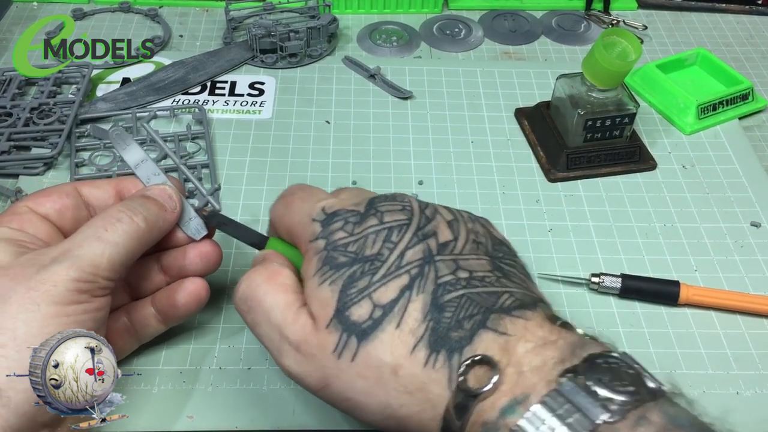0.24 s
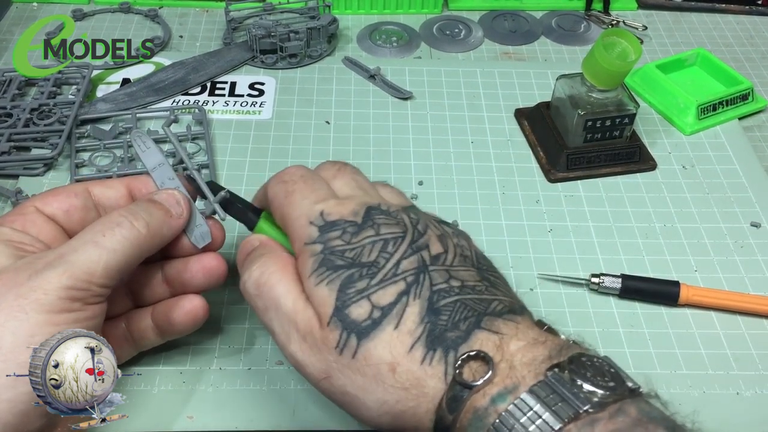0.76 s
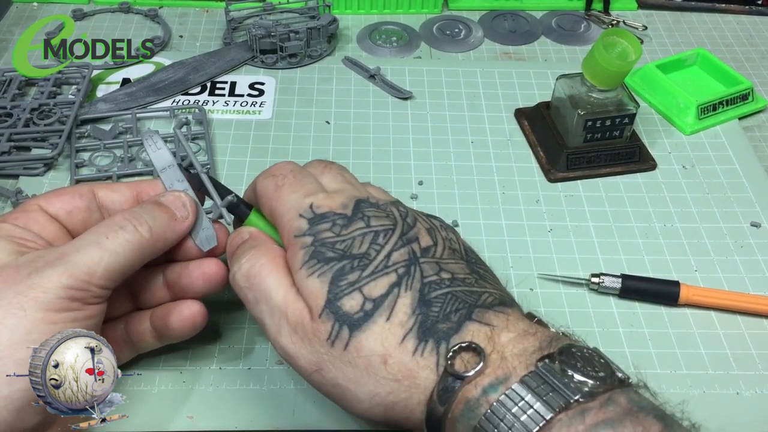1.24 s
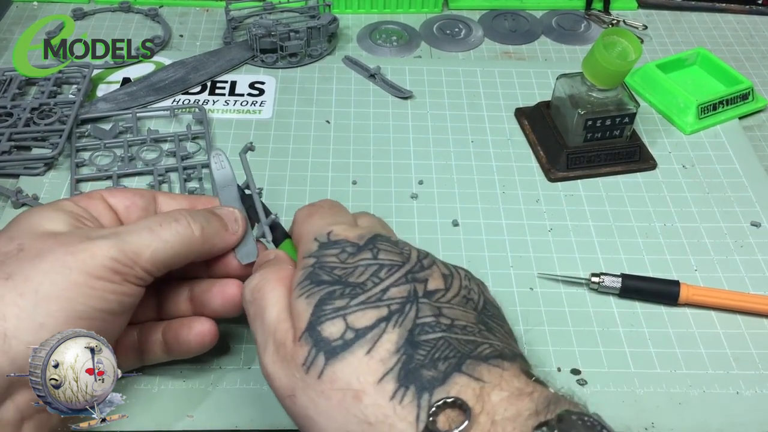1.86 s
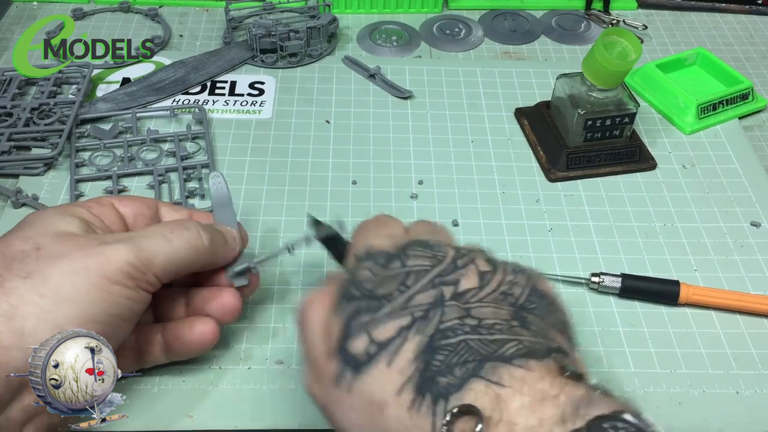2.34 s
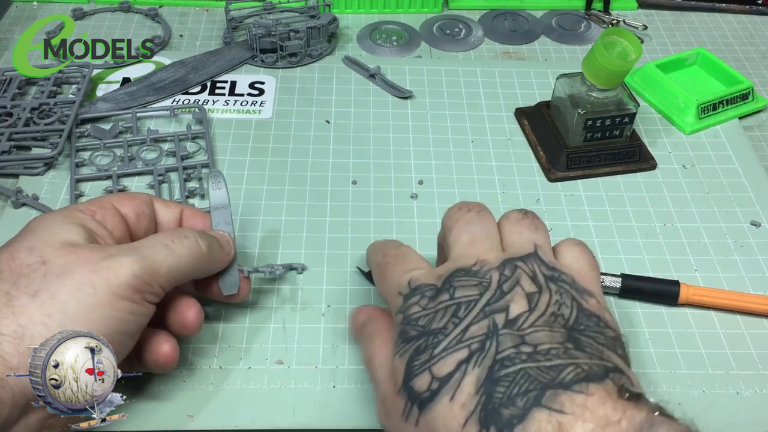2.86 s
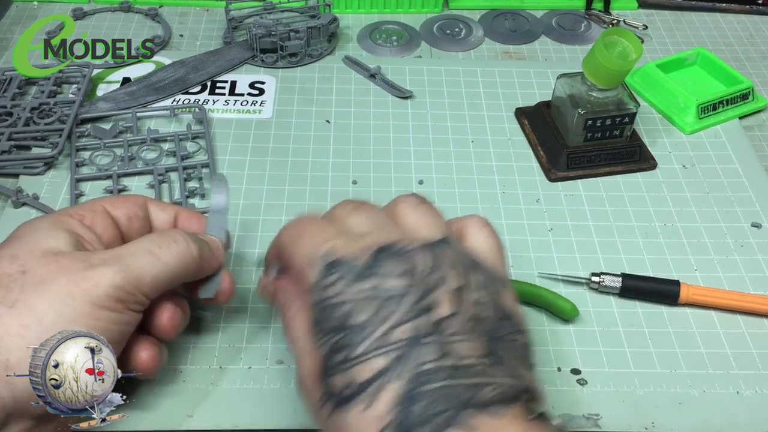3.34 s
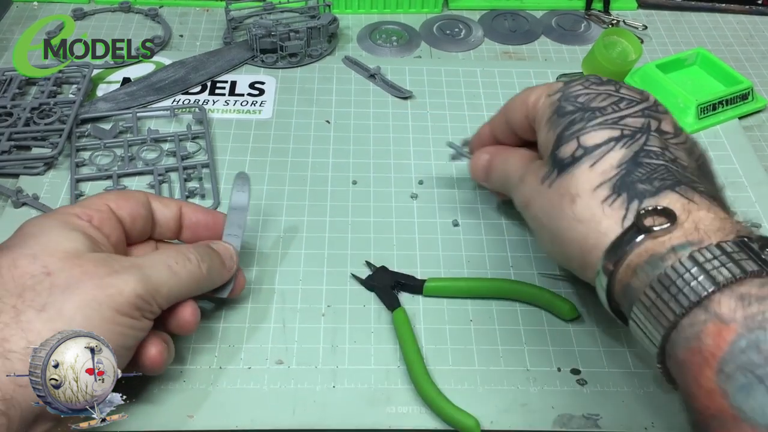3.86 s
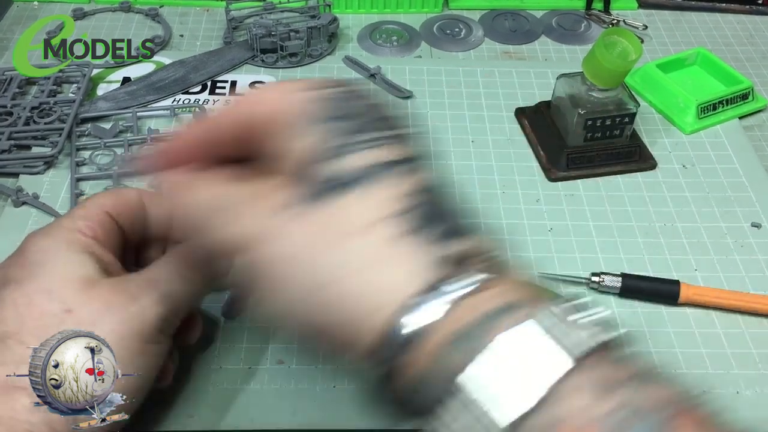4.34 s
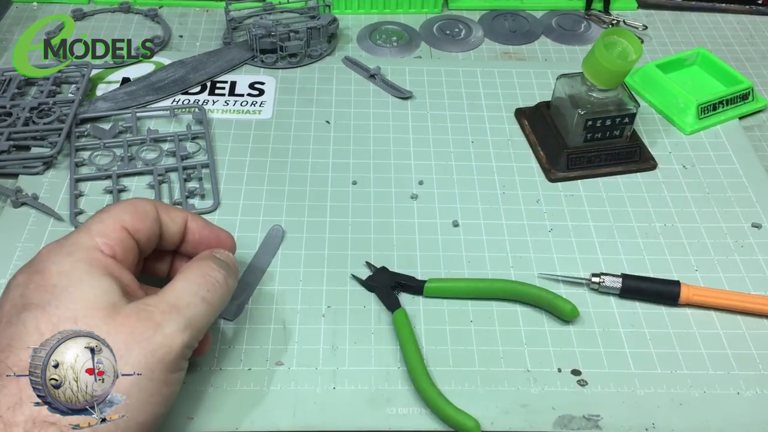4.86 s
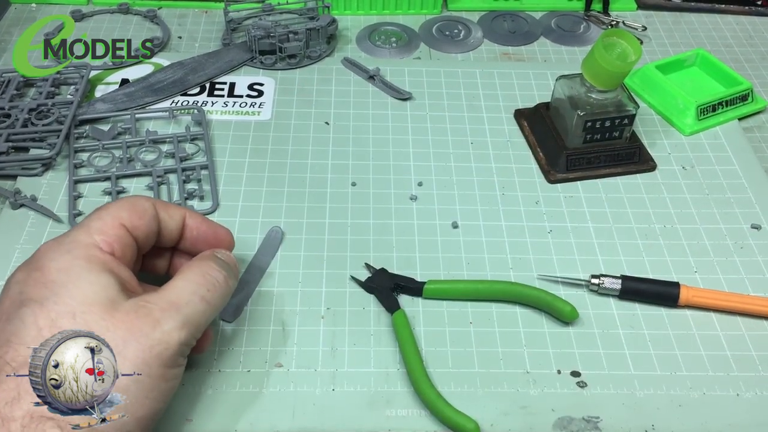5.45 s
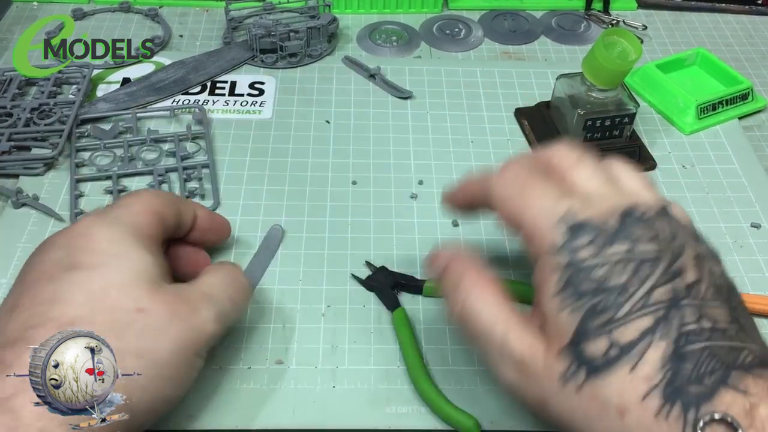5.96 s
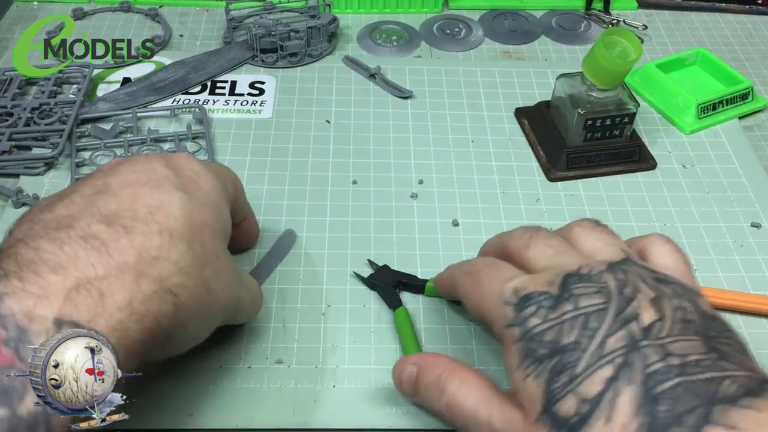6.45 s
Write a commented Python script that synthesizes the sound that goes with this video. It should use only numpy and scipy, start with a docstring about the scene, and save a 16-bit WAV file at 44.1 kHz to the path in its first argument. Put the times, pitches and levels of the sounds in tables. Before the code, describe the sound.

A sharp plastic snip, quieter ticks, hard tool knocks on a bench, a bright strap rattle, then a hollow clatter and soft rubbing in a quiet room.

```python
"""In a small, quiet room, plastic model parts are trimmed and handled on a workbench.
Cutters snap plastic, a sleeve ticks, tools and knuckles land, a watch strap rattles, a hollow thing clatters:
each is a click that rings on. A part scraped over the mat and short rubbing strokes are many tiny slips.
Sleeves rustle as shaped noise, a dry bump is one click, and air noise, rumble and a thin whine lie beneath."""
import sys
import numpy as np
from scipy import signal
from scipy.fft import rfft, irfft
from scipy.io import wavfile

SR = 44100
rng = np.random.default_rng(int(sys.argv[2]) if len(sys.argv) > 2 else 0)


def pcm_store(signal):
    """Save signal as 16-bit PCM."""
    levels = np.round(np.clip(np.atleast_2d(signal), -1, 1) * 32767)
    wavfile.write(sys.argv[1], SR, levels.astype(np.int16).T)


N = 295470  # length of the scene in samples
CLICK_SAMPLES = 16384  # length of every click and room tail


def gain_of(db):
    """Turns decibels into a plain multiplier."""
    return 10 ** (np.asarray(db) / 20)


def evened(x):
    """Scales a sound to an average (rms) level of 1."""
    return x / np.sqrt(np.mean(x ** 2) + 1e-30)


def unit(x):
    """Scales a sound to a total energy of 1."""
    return x / (np.linalg.norm(x) + 1e-15)


def read(points, hz):
    """Reads a curve between its points, with pitch spaced roughly as we hear it."""
    point_hz, value = np.transpose(points)
    return np.interp(np.log(hz + 1), np.log(point_hz + 1), value)


def add(mix, start_s, sound):
    """Mixes a sound in at its start time, cutting off what runs past the end."""
    part = mix[max(round(start_s * SR), 0):][:len(sound)]
    part += sound[:len(part)]


def noise(colour, size=N):
    """Random noise of rms 1, with its low and high parts balanced by a colour curve."""
    spectrum = rfft(rng.standard_normal(size))
    hz = np.fft.rfftfreq(size, 1 / SR)
    return evened(irfft(spectrum * gain_of(read(colour, hz)), size))


def crack(colour, modes=(), spread_s=0):
    """A click whose resonances ring on; bending waves can bring its bass late."""
    hz = abs(np.fft.fftfreq(CLICK_SAMPLES, 1 / SR))
    level_db = read(colour, hz)
    for mode_hz, width_hz, lift_db in modes:
        width_hz = max(width_hz, .055 * mode_hz, 55)  # very narrow resonances are widened
        level_db = level_db + lift_db / (1 + (2 * (hz - mode_hz) / width_hz) ** 2)
    # this timing of the pitches makes the click start at once and ring only afterwards
    spectrum = np.exp(np.conj(signal.hilbert(np.log(gain_of(level_db)))))
    lag = 4 * np.pi * spread_s * np.sqrt(1000 * hz)  # spread_s is the delay at 1 kHz
    delayed = spectrum * np.exp(-1j * lag)
    click = irfft(delayed[:CLICK_SAMPLES // 2 + 1], CLICK_SAMPLES)
    fade = np.cos(np.linspace(0, np.pi / 2, CLICK_SAMPLES)) ** 2
    return unit(fade * click)


def room_tail(rise_s=0.00076):
    """Dense reflections from the bench and near walls, with different pitches dying at different rates."""
    # time to fall by 60 dB: pitch_hz, fade_s
    room_fade = [(100, 0.24), (500, 0.18), (1500, 0.13), (4000, 0.14), (9000, 0.13), (16000, 0.11)]
    hz, t, pieces = signal.stft(rng.standard_normal(CLICK_SAMPLES), SR, nperseg=256)
    decay = gain_of(-60 * t / read(room_fade, hz)[:, None])
    tail = signal.istft(pieces * decay, SR, nperseg=256)[1][:CLICK_SAMPLES]
    build_up = 1 - np.exp(-np.arange(CLICK_SAMPLES) / SR / rise_s)
    return unit(tail * build_up)


def blows(hits, colour, modes, spot_db, shiver_db, shiver_fade_s, room_db, edge_db=-40):
    """Each blow is a ringing crack, then a brief shiver and the room, all shaped by the contact."""
    spot_width, spread_s = 0.32, 0.00031  # width as a share of the spot's pitch; bass delay at 1 kHz
    out, t = np.zeros(N), np.arange(CLICK_SAMPLES) / SR
    for start_s, peak_db, hard_hz, low_hz, ring_db, spot_hz in hits:
        spot = (spot_hz, spot_width * spot_hz, spot_db)
        click = crack(colour, list(modes) + [spot], spread_s)
        # a soft contact loses treble; a light one cannot move the bass
        soft = signal.butter(2, hard_hz, fs=SR, output="sos")
        light = signal.butter(1, low_hz, "high", fs=SR, output="sos")
        first = signal.sosfilt(np.vstack([soft, light]), click)
        first = first + gain_of(edge_db) * np.diff(click, prepend=0)  # a hard edge always ticks a little
        shiver = unit(rng.standard_normal(CLICK_SAMPLES) * gain_of(-60 * t / shiver_fade_s))
        surroundings = gain_of(shiver_db) * shiver + gain_of(room_db) * room_tail()
        after = signal.fftconvolve(first, surroundings)[:CLICK_SAMPLES]
        first_peak = abs(signal.hilbert(first)).max()
        add(out, start_s, gain_of(peak_db) * (first + gain_of(ring_db) * after) / first_peak)
    return out


def grains(per_s, spread_db):
    """Tiny slips at random moments, a few much larger than the rest."""
    size = gain_of(spread_db * np.minimum(rng.exponential(1, N), 4))
    happens = rng.random(N) < per_s / SR
    return evened(size * rng.standard_normal(N) * happens)


def still_room():
    """The quiet room: steady air noise and deep rumble from shaped noise, with a thin electrical whine."""
    # colour of the still air: pitch_hz, level_db
    air_colour = [(18, -72), (30, 12.5), (41, -22.5), (59, -29), (138, -24), (266, -14), (415, -38.5),
                  (684, -31.5), (2290, -33.5), (3770, -34.5), (4080, -34.5), (14800, -42), (16000, -63.5)]
    # colour of the deep rumble: pitch_hz, level_db
    rumble_colour = [(1, -9), (4, 4), (8, 1), (14, -12.5), (25, -29), (50, -24), (90, -35.5), (200, -68.5)]
    air_db, rumble_db, whine_db, whine_hz = -59, -36, -83.5, 3770
    whine = np.sqrt(2) * np.sin(2 * np.pi * whine_hz * np.arange(N) / SR)  # rms 1
    air = gain_of(air_db) * noise(air_colour)
    rumble = gain_of(rumble_db) * noise(rumble_colour)
    return air + rumble + gain_of(whine_db) * whine


def sleeves(uneven_db=1.34):
    """Cloth rustle that swells, holds and fades with each arm movement, uneven as the cloth folds."""
    # movements of an arm: start_s, end_s, soft_body_db, hiss_db
    arm_moves = [(0.39, 1.207, -65.5, -83), (1.723, 2.57, -61, -67), (2.94, 3.14, -54.5, -72),
                 (3.24, 4.28, -58, -71), (4.335, 5.138, -55, -62), (5.37, 5.74, -56, -65.5),
                 (5.66, 6.346, -60, -64.5), (6.276, 6.8, -60, -73)]
    # colour of the soft body of the rustle: pitch_hz, level_db
    body_colour = [(35, -18), (60, -20), (70, -4), (191, -7), (453, -10.5), (589, -13.5), (655, -12),
                   (1720, -24.5), (4000, -36), (5200, -69), (8800, -120)]
    # colour of the sleeve hiss: pitch_hz, level_db
    sleeve_hiss_colour = [(880, 3), (1500, 3), (3810, 2), (5330, 0.5), (13700, -5.5), (16000, -28)]
    attack_s, release_s = 0.081, 0.1  # every movement gathers speed and slows down alike
    resting_db = -65  # soft body that stays while the hands only hold a part
    t = np.arange(N) / SR
    body_power, hiss_power = np.full(N, gain_of(resting_db) ** 2), np.zeros(N)
    for start_s, end_s, body_db, hiss_db in arm_moves:
        speed = np.clip(np.minimum((t - start_s) / attack_s, (end_s - t) / release_s), 0, 1)
        body_power += speed * gain_of(body_db) ** 2
        hiss_power += speed * gain_of(hiss_db) ** 2
    wobble = noise([(0, -20), (6, 0), (25, 0), (80, -40), (300, -100)])  # (Hz, dB)
    folds = gain_of(uneven_db * wobble)
    body = np.sqrt(body_power) * noise(body_colour)
    hiss = np.sqrt(hiss_power) * noise(sleeve_hiss_colour)
    return folds * (body + hiss)


def snips_and_ticks():
    """Plastic snaps and ticks under cutter jaws or between fingers, and two faint ticks of a crackling sleeve."""
    # each snap or tick, the last two from the sleeve: start_s, first_crack_peak_db,
    # hardness_upper_edge_hz, lower_edge_hz, ring_db (against the first crack), struck_spot_hz
    snaps = [(.2233, -4.5, 16000, 5030, -6.5, 9900), (1.8405, -36, 16000, 14000, -14, 14500),
             (2.2203, -14.5, 13500, 2580, -3, 3740), (2.4045, -28, 12000, 2200, -0.5, 9000),
             (2.4808, -17.5, 15900, 9000, -6, 13800), (2.5552, -16, 9900, 7000, -2.5, 3170),
             (3.3851, -19, 16000, 13000, -24, 11500), (4.588, -31, 6250, 5000, -20, 5740),
             (4.9165, -40.5, 3500, 2500, -14, 2700), (4.9415, -38.5, 3500, 2500, -16, 2700)]
    # broad colour of these sounds: pitch_hz, level_db
    snap_colour = [(100, 17.5), (240, 24), (560, -6.5), (900, -18), (1500, -4.5), (2800, -7), (5000, -7),
                   (8500, -6), (12000, -10), (16000, -9)]
    # their resonances: pitch_hz, width_hz (before the least width in crack), lift_db
    snap_modes = [(1340, 1140, 12.7), (3850, 170, 4.4), (6000, 200, 5.5), (8000, 1100, 4.6),
                  (8900, 840, 2.6), (11100, 170, 6.5), (13500, 710, 7.3)]
    return blows(snaps, snap_colour, snap_modes, spot_db=6, shiver_db=5.5, shiver_fade_s=0.04,
                 room_db=0.0)


def strokes(lift_db=7, width=0.21):
    """Skin and tools rub the mat: fine slips hiss and coarse ones rasp, both swelling and fading."""
    # each stroke: start_s, end_s, level_db, rasp_db (against the hiss), resonance_hz
    rubs = [(.491, .53, -68, -12, 12000), (1.764, 1.893, -70.5, 9, 1800), (2.326, 2.396, -61.5, 7, 3250),
            (2.495, 2.572, -57, 4.5, 3070), (2.985, 3.062, -59.5, 15, 1410),
            (3.127, 3.198, -55.5, 9.5, 1330), (6.061, 6.162, -56, -12, 7000),
            (6.12, 6.256, -63.5, -13, 4050), (6.239, 6.309, -57.5, -11, 11000),
            (6.333, 6.407, -63, 9, 2100), (6.361, 6.474, -61, 2.5, 11600),
            (6.595, 6.705, -54.5, 2.5, 11100)]
    # colour of the fine hiss: pitch_hz, level_db
    hiss_colour = [(1000, -38.5), (3000, 1), (4500, -2.5), (8000, 2.5), (12000, 0), (14500, -5),
                   (16000, -12.5)]
    # colour of the low rasp: pitch_hz, level_db
    rasp_colour = [(200, 3), (700, -1), (1200, 4.5), (2200, -4.5), (4000, -12), (9000, -50)]
    wobble = noise([(5, 0), (50, 0), (150, -40), (400, -100)])  # (Hz, dB)
    grip = gain_of(2.2 * wobble)  # skin catches and lets go
    fine = grip * grains(per_s=6000, spread_db=3)
    coarse = grip * grains(per_s=2500, spread_db=2.5)
    out = np.zeros(N)
    for start_s, end_s, level_db, rasp_db, hz in rubs:
        span = slice(int(start_s * SR), int(end_s * SR))
        spot = [(hz, width * hz, lift_db)]
        speed = signal.windows.cosine(len(fine[span]))
        hiss = signal.fftconvolve(speed * fine[span], crack(hiss_colour, spot))
        rasp = signal.fftconvolve(speed * coarse[span], crack(rasp_colour, spot))
        add(out, start_s, gain_of(level_db) * (hiss + gain_of(rasp_db) * rasp))
    return out


def knocks():
    """Tools and knuckles land on the bench, which rings with a very short shiver."""
    # each landing: start_s, first_crack_peak_db, hardness_upper_edge_hz, lower_edge_hz,
    # ring_db (against the first crack), struck_spot_hz
    landings = [(1.758, -42.5, 4100, 710, -9, 2000), (1.782, -40, 2500, 450, 4.5, 900),
                (1.868, -38, 263, 150, -5, 200), (2.905, -14, 2650, 220, 2.5, 450),
                (2.9157, -2, 9500, 230, -2, 2750), (3.0942, -0.5, 6840, 230, -4, 2200),
                (3.1315, -22.5, 2490, 60, 2.5, 1300), (3.1592, -29.5, 9000, 80, 5.5, 1320),
                (3.389, -40.5, 4000, 900, -0.5, 1800), (3.4995, -34.5, 3000, 100, -5, 604),
                (3.771, -41, 3000, 500, -9, 2730), (4.084, -40, 6000, 600, -10, 910),
                (4.669, -43, 385, 300, 4.5, 363), (5.02, -44, 260, 100, 4, 200),
                (6.589, -41, 1510, 99, 11.5, 1300)]
    # broad colour of the bench: pitch_hz, level_db
    bench_colour = [(30, -3), (60, 2.5), (150, -1.5), (380, -2.5), (550, -10), (1000, -7.5), (1700, -7.5),
                    (2750, -9), (6000, -15), (10000, -15.5), (16000, -19.5)]
    # its resonances: pitch_hz, width_hz (before the least width in crack), lift_db
    bench_modes = [(370, 190, 1.9), (694, 91, 6.4), (1015, 110, 8.6), (1400, 370, 7), (2130, 330, 3.1),
                   (2530, 130, 1.7), (3730, 370, 7)]
    return blows(landings, bench_colour, bench_modes, spot_db=4.5, shiver_db=-3.5, shiver_fade_s=0.011,
                 room_db=-1.0)


def scrape(room_db=-9):
    """A part bites the mat, presses harder and lifts at once; its edge catches in dense, ringing slips."""
    # broad colour of the scrape: pitch_hz, level_db
    scrape_colour = [(500, -38), (1300, -14), (2300, -15), (4000, -19), (6000, -12), (8000, -5),
                     (11000, -10.5), (14000, -12), (16000, -22)]
    # its resonances: pitch_hz, width_hz (before the least width in crack), lift_db
    scrape_modes = [(2280, 210, 10.3), (3220, 650, 16.7), (4650, 520, 16.5), (5560, 280, 8),
                    (6600, 290, 10.6), (7740, 1200, 8.3), (11400, 440, 6.4), (12700, 250, 6.2)]
    start_s, length_s, bite_s = 3.331, .029, 0.0089
    lift_off_db, swell_db = -21.5, 14  # level as it lifts, and its growth over the drag
    t = np.arange(N) / SR - start_s
    bite = np.clip(t / bite_s, 0, 1)
    pressure = bite * gain_of(swell_db * np.minimum(t / length_s - 1, 0))
    slips = grains(per_s=7000, spread_db=1.5)
    slips = slips * gain_of(lift_off_db) * pressure * (t < length_s)
    click = crack(scrape_colour, scrape_modes)
    body = click + gain_of(room_db) * signal.fftconvolve(click, room_tail())[:CLICK_SAMPLES]
    return signal.oaconvolve(slips, unit(body))[:N]


def links():
    """Links of a metal watch strap rattle as a run of small, bright blows."""
    # each link: start_s, first_crack_peak_db, hardness_upper_edge_hz, lower_edge_hz,
    # ring_db (against the first crack), struck_spot_hz
    link_hits = [(4.2079, -22, 10000, 4000, -8, 7000), (4.2125, -19, 14900, 1490, 4.5, 12900),
                 (4.2207, -13.5, 16000, 1500, -8.5, 15000), (4.2360, -19.5, 14000, 1800, -6.5, 12800),
                 (4.2595, -41, 10000, 1800, -7, 7000), (4.2660, -23.5, 13100, 1500, 5, 13000),
                 (4.2975, -38.5, 6000, 1500, 5, 2100), (4.3168, -37, 8000, 1500, 1, 2100)]
    # broad colour of the strap: pitch_hz, level_db
    strap_colour = [(200, -25), (450, -8), (1000, -4), (2100, -0.5), (3400, -11), (4700, -8.5),
                    (7000, -6.5), (12500, -9.5), (16000, -4.5)]
    # its resonances: pitch_hz, width_hz (before the least width in crack), lift_db
    strap_modes = [(466, 82, 17), (1380, 180, 3.7), (2270, 200, 7.7), (3930, 460, 7), (7460, 830, 2.8),
                   (12600, 1500, 10.7)]
    return blows(link_hits, strap_colour, strap_modes, spot_db=1.5, shiver_db=4, shiver_fade_s=0.017,
                 room_db=2.5)


def clatter():
    """A hollow thing is set down, tips and settles: blows with strong low resonances."""
    # each blow: start_s, first_crack_peak_db, hardness_upper_edge_hz, lower_edge_hz,
    # ring_db (against the first crack), struck_spot_hz
    hollow_hits = [(5.2792, -5.5, 2670, 330, -5.5, 1040), (5.3855, -9, 1190, 330, -3.5, 990),
                   (5.4165, -17, 1200, 298, -2.5, 1050), (5.4312, -30, 1200, 200, 3, 350),
                   (5.444, -22.5, 8900, 1500, 0.5, 1550), (5.4468, -14, 3300, 1000, -1, 1590),
                   (5.4575, -17, 6000, 1000, -1, 1900), (5.4672, -23, 5500, 1100, 3, 1670),
                   (5.4895, -21, 9100, 2000, 0.5, 3160), (5.4988, -20.5, 7500, 1470, .5, 2850),
                   (5.527, -34.5, 1600, 400, 5.5, 1150)]
    # broad colour of the hollow thing: pitch_hz, level_db
    hollow_colour = [(150, -14), (350, -7), (560, -13.5), (900, -6), (1600, -4), (2300, -13.5), (3300, -17),
                     (5000, -19), (9000, -26), (16000, -47)]
    # its resonances: pitch_hz, width_hz (before the least width in crack), lift_db
    hollow_modes = [(352, 24, 8.1), (460, 66, 13.6), (678, 126, 13), (766, 40, 2), (1026, 140, 8.1),
                    (1255, 100, 5.5), (1497, 180, 7.7), (1910, 91, 6), (3130, 360, 5.5)]
    return blows(hollow_hits, hollow_colour, hollow_modes, spot_db=5.5, shiver_db=1.0, shiver_fade_s=0.04,
                 room_db=4, edge_db=-15.0)


def bump():
    """A bump reaches the microphone through its mount: one dry pulse with no room around it."""
    # colour of the bump: pitch_hz, level_db
    bump_colour = [(100, -4), (350, 3), (850, 5), (1500, -4), (2100, -29), (3800, -9.5), (6000, -23),
                   (10500, -20), (16000, -44)]
    start_s, peak_db = 6.0062, -18.5
    out, pulse = np.zeros(N), crack(bump_colour)
    add(out, start_s, gain_of(peak_db) * pulse / abs(pulse).max())
    return out


def scene():
    """Adds all sources together at one microphone above the bench."""
    background = still_room() + sleeves()
    hits = snips_and_ticks() + knocks() + links() + clatter() + bump()
    rubbing = strokes() + scrape()
    return (background + hits + rubbing)[None]


def record(dry):
    """Rounds off the sharpest peaks, then cuts the highest treble as the recorder does."""
    rounded = dry / (1 + (abs(dry) / .72) ** 4) ** .25  # no peak can pass 0.72 here
    treble_cut = signal.firwin(255, 16300, window=("kaiser", 8), fs=SR)  # edge at 16300 Hz
    return signal.oaconvolve(rounded, treble_cut[None], "same")


dry = scene()
out = record(dry)
pcm_store(out)
```